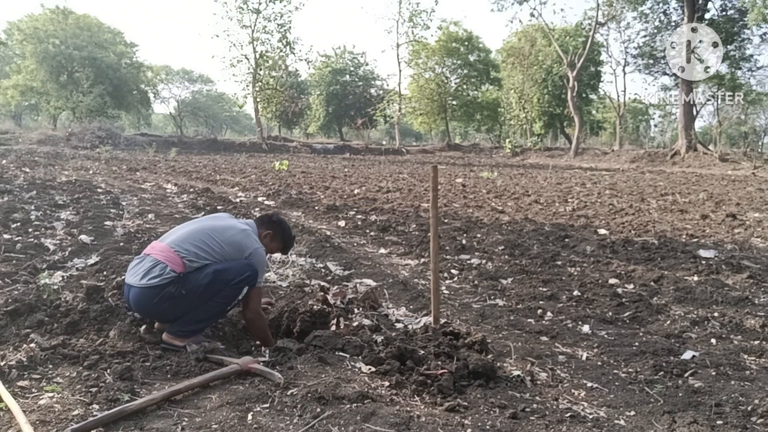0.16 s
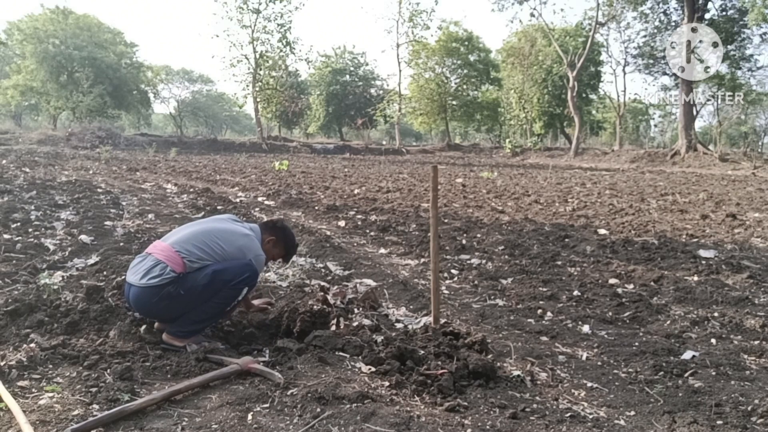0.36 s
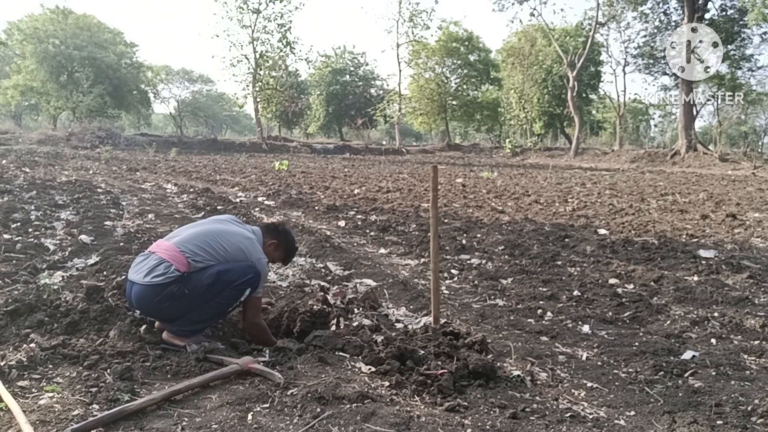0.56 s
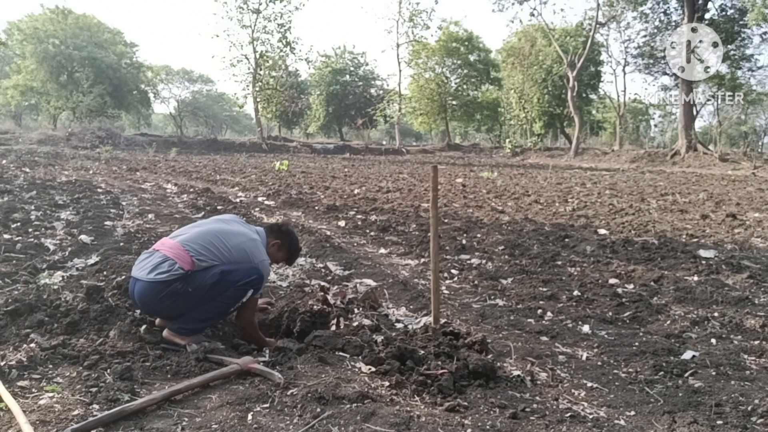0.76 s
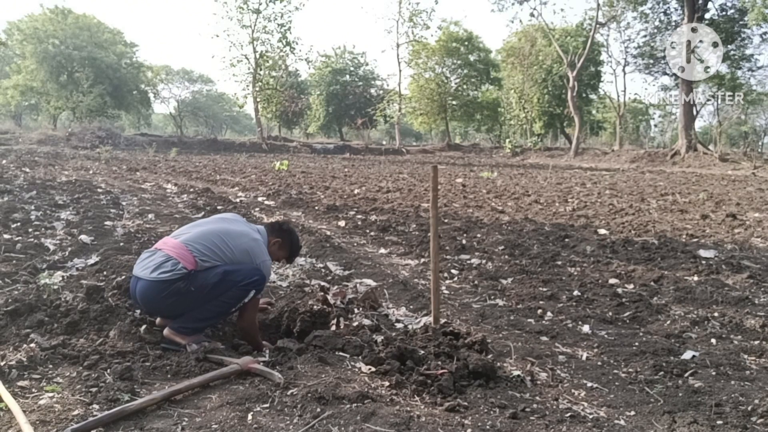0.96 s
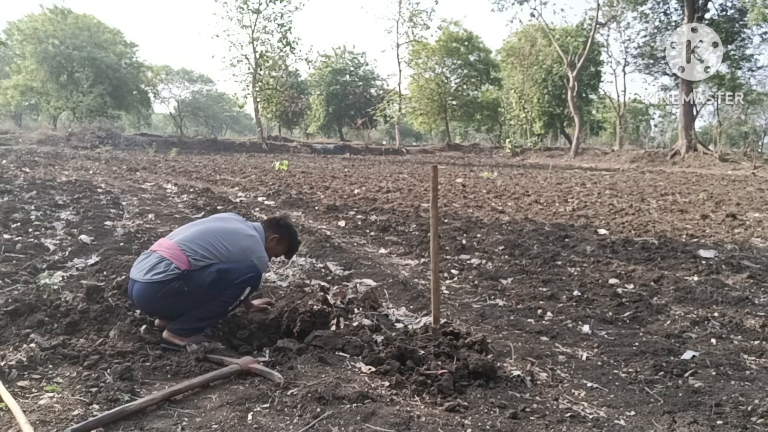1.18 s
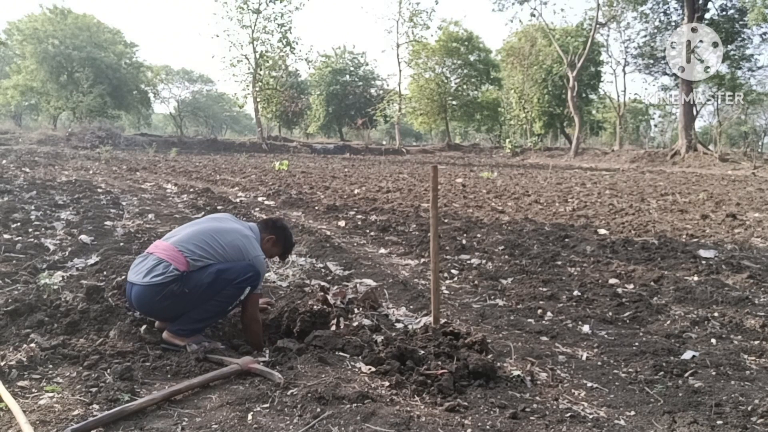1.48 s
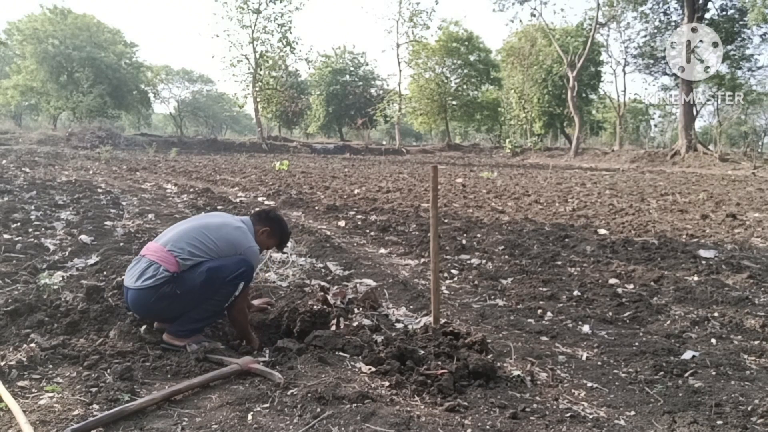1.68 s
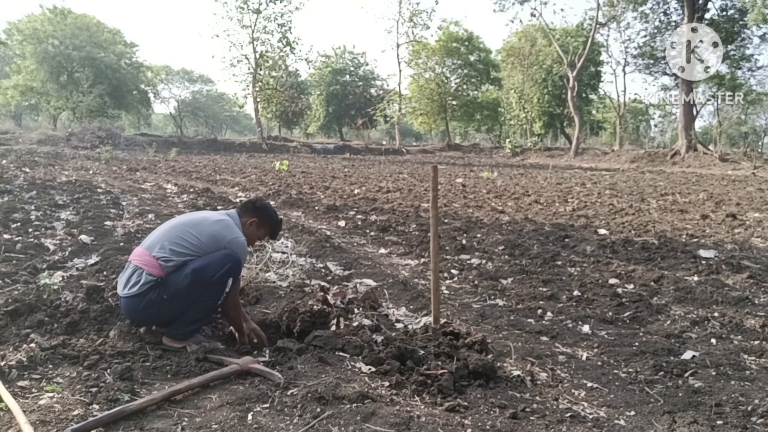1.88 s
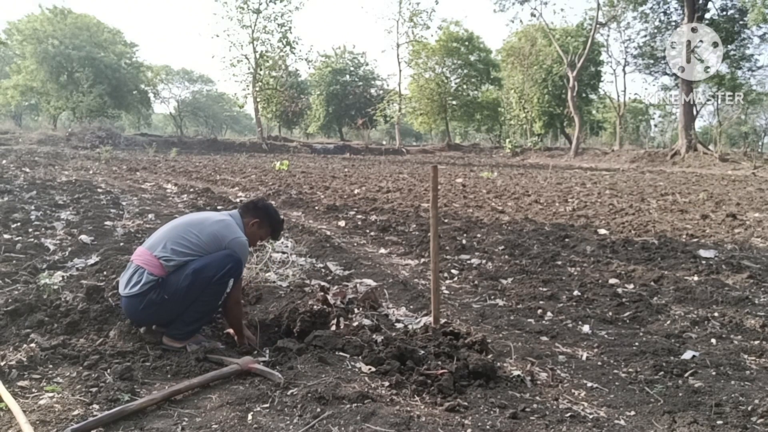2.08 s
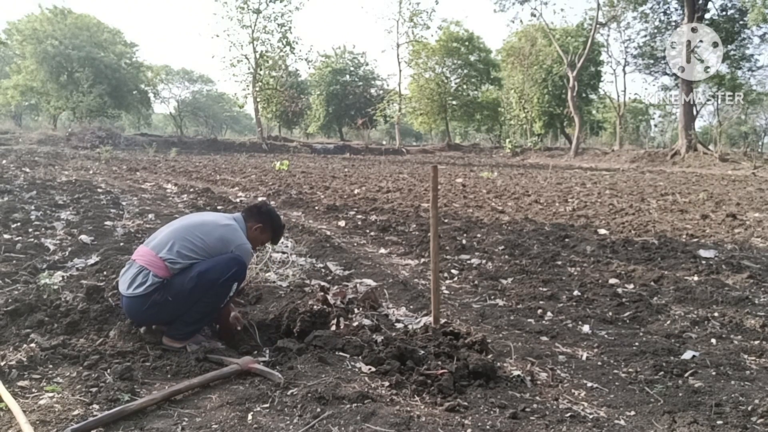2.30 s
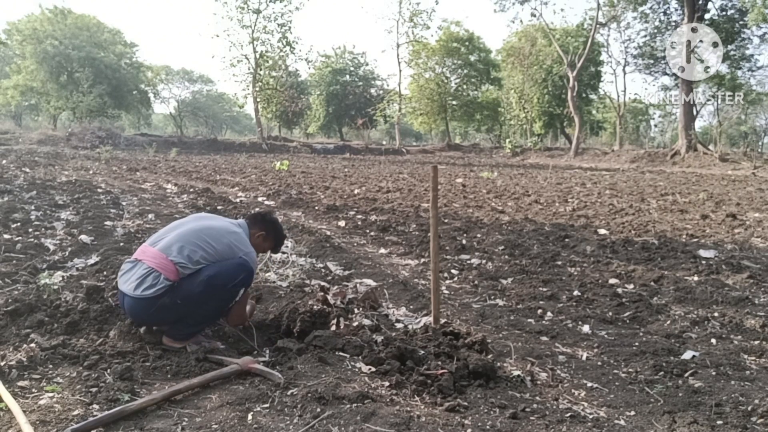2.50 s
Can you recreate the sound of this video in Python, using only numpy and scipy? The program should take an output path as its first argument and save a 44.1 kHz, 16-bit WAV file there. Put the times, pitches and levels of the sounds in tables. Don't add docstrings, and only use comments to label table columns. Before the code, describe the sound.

Hands scrape dry soil, left of centre: soft, short gritty strokes from the start, a sharp clod crack at 0.44 s, smaller cracks around 0.8 and 1.2 s. Rasping builds at 1.65 s into the loudest crunch at 1.85 s, with pebble ticks and faint thuds until 1.95 s. Sparse scrapes return from 2.3 s. Low wind flutters separately on both sides, strongest around 2.2 s; faint high birds chirp far off.

```python
import sys
import numpy as np
from scipy import signal
from scipy.fft import rfft, irfft
from scipy.io import wavfile
from scipy.ndimage import uniform_filter1d

SR = 44100
rng = np.random.default_rng(int(sys.argv[2]) if len(sys.argv) > 2 else 0)


def int16_out(signal):
    q = np.round(np.clip(np.atleast_2d(signal).T, -1, 1) * 32767)
    wavfile.write(sys.argv[1], SR, q.astype(np.int16))


def invert_db(level):
    return 10 ** (np.asarray(level, dtype=float) / 20)


N = 116865

# (start [s], rise [s], fall [s], left level [dB], tilt [dB per octave])
STROKES = [(.03, 0.0056, 0.0062, -66.5, -2.5), (0.085, 0.013, 0.02, -57.5, 3),
           (0.187, 0.022, 0.057, -60.5, 1.5), (0.388, 0.038, 0.077, -52.5, 1),
           (0.501, 0.034, 0.008, -58, 3), (0.602, 0.013, 0.0027, -66, -1.5), (0.741, 0.02, 0.051, -60, 1.5),
           (1.001, 0.015, 0.1, -71, -4), (1.118, 0.02, 0.13, -54.5, 1.5), (1.171, 0.042, 0.034, -53.5, 1.5),
           (1.261, 0.014, 0.035, -55, 4), (1.638, 0.033, 0.035, -52.5, 1.5),
           (1.674, 0.012, 0.074, -45, 0.5), (1.842, 0.003, 0.024, -29.5, -0.5),
           (1.85, 0.033, 0.027, -30, 0), (1.933, 0.073, 0.042, -53, 1), (2.31, 0.014, 0.052, -63.5, -5),
           (2.446, 0.066, 0.064, -53, 0.5), (2.53, 0.062, 0.02, -56.5, 7.5)]
# (time [s], peak level [dB], centre [Hz])
CLODS = [(0.1113, -37.5, 5560), (0.3426, -40.5, 5500), (0.4409, -22.5, 6350), (0.5289, -38.5, 4600),
         (0.605, -43, 5430), (0.7833, -34, 10800), (0.8116, -31.5, 11600), (1.0176, -40, 5257),
         (1.1397, -38, 5494), (1.1991, -41, 5350), (1.2063, -40, 3780), (1.2208, -30, 7800),
         (1.2296, -28, 5120), (1.2595, -43, 6200), (1.2727, -29, 10200), (1.3169, -37.5, 7500),
         (1.8455, -16.5, 8920), (2.3371, -54.5, 3760), (2.4194, -41.5, 8210)]
# (time [s], peak level [dB], centre [Hz])
PEBBLES = [(0.0338, -51.5, 3200), (0.0438, -48, 5330), (0.0972, -41, 5200), (0.2987, -50.5, 4960),
           (0.385, -43, 5600), (0.4265, -40, 5550), (0.4718, -38.5, 7050), (0.616, -39.5, 4940),
           (0.6569, -41, 12400), (0.7467, -45, 5870), (0.7587, -44.5, 5090), (0.7634, -43.5, 10200),
           (0.8375, -46, 7000), (0.8654, -59, 3652), (0.9504, -53, 5470), (1.0084, -49.5, 4700),
           (1.0545, -52, 5130), (1.07, -47.5, 11400), (1.1288, -45.5, 5423), (1.1534, -44, 6700),
           (1.4734, -43, 12660), (1.5095, -44.5, 10640), (1.5399, -54, 3250), (1.5754, -50, 9900),
           (1.6287, -49.5, 6920), (1.6611, -42, 2590), (1.6796, -31, 10500), (1.7644, -45, 5850),
           (1.8484, -35.5, 5203), (1.8644, -31, 5136), (1.8684, -30, 2838), (1.8824, -37, 5200),
           (1.8874, -25, 5150), (1.9114, -22, 12300), (1.9639, -35.5, 13720), (2.0204, -47, 5350),
           (2.0667, -52, 5440), (2.1824, -53.5, 14170), (2.3434, -55, 3705), (2.3894, -56, 13740),
           (2.4693, -37, 11180), (2.5461, -35.5, 13800), (2.5944, -37, 13900)]
# (time [s], peak level [dB], centre [Hz])
THUDS = [
    (1.849, -32, 705),
    (1.883, -35, 910),
    (1.914, -44, 997),
]
# (time [s], length [s], level [dB])
PUFFS_LEFT = [(0.21, 0.031, -45), (0.587, 0.042, -38), (0.704, 0.015, -48.5), (0.739, 0.031, -37),
              (0.891, 0.012, -46.5), (1.049, 0.024, -43), (1.225, 0.018, -45), (1.245, 0.014, -45.5),
              (1.347, 0.038, -34.5), (1.402, 0.016, -35), (1.439, 0.01, -43.5), (1.498, 0.071, -34.5),
              (1.561, 0.043, -36), (1.618, 0.019, -35), (1.644, 0.0074, -35.5), (1.674, 0.011, -36.5),
              (1.785, 0.03603, -44), (1.825, 0.01, -42.5), (2.075, 0.029, -41), (2.147, 0.033, -28.5),
              (2.216, 0.03, -29), (2.283, 0.038, -31), (2.326, 0.0096, -47.5), (2.382, 0.023, -36)]
PUFFS_RIGHT = [(0.516, 0.03, -32.5), (0.569, 0.015, -34), (0.665, 0.016, -44), (0.693, 0.014, -40),
               (0.811, 0.017, -38), (0.919, 0.036, -36.5), (0.953, 0.0061, -36.5), (1.022, 0.017, -40.5),
               (1.096, 0.013, -41.5), (1.137, 0.014, -38.5), (1.286, 0.016, -38), (1.37, 0.023, -35),
               (1.405, 0.02, -40.5), (1.457, 0.015, -43), (1.57, 0.0192, -42), (1.766, 0.0323, -36),
               (1.885, 0.01, -34.5), (2.002, 0.027, -32), (2.046, 0.031, -32.5), (2.091, 0.014, -34.5),
               (2.124, 0.013, -31), (2.227, 0.02, -36), (2.357, 0.018, -36.5)]
# (time [s], peak level [dB])
FLICKS_LEFT = [(2.156, -28), (2.17, -30), (2.221, -25.5), (2.291, -24)]
FLICKS_RIGHT = [(0.912, -41.5), (1.365, -43), (1.778, -36.5), (2.091, -32), (2.123, -39.5), (2.226, -39.5),
                (2.344, -36.5)]
# (time [s], level [dB])
BREEZE = [
    (0, -58),
    (.45, -50.5),
    (1.3, -51),
    (1.8, -53),
    (2.15, -45.5),
    (2.65, -53.5),
]
# (start [s], tick level [dB], whistle level [dB])
TWITTERS = [(0.139, -73, -68), (0.345, -72, -70), (2.008, -94, -64), (2.217, -66, -63), (2.438, -73, -71)]
# (time from call start [s], pitch [Hz], level [dB])
TICK = [(0, 4570, -3), (.005, 7000, 6.5), (.009, 8050, 2.5), (0.022, 8400, -15)]
WHISTLE = [(0.056, 11800, -11), (0.067, 11160, -6.5), (0.081, 6960, -3), (0.09, 5540, 6.5),
           (.115, 4000, -52)]
# (time [s], pitch [Hz], level [dB])
SWOOP = [(0.114, 5650, -65), (0.144, 5330, -65), (0.188, 5210, -68.5), (0.21, 5210, -68),
         (0.226, 5630, -67)]
# (start [s], length [s], from [Hz], to [Hz], level [dB])
GLIDES = [ (0.598, 0.015, 1810, 1790, -72), (0.663, 0.012, 12900, 11800, -64.5),
          (0.916, 0.029, 11900, 11840, -70), (1.07, 0.033, 11250, 11740, -71.5),
          (1.273, 0.0062, 1780, 1910, -67), (1.318, 0.055, 13670, 13090, -70),
          (1.415, 0.059, 8690, 10400, -72), (1.582, 0.018, 9550, 10500, -71.5),
          (0.068, 0.014, 14200, 14900, -79), (.478, 0.014, 13200, 11900, -64),
          (0.565, 0.013, 13600, 11900, -66), (0.842, 0.017, 11400, 11500, -77),
          (1.321, 0.02, 12680, 12420, -59), (1.441, 0.011, 12600, 11400, -72),
          (1.467, 0.031, 11600, 12900, -73), (1.6, 0.02, 12400, 13140, -72),
          (2.222, 0.013, 12430, 11000, -78.5), (2.622, 0.017, 13000, 12300, -67)]
# (frequency [Hz], gain [dB])
SOIL_COLOUR = [(330, -20.5), (650, -17.5), (1500, -7), (2500, -4.5), (4800, -5), (15500, -3.5)]
AIR_COLOUR = [(270, -42), (460, -3.5), (2250, -1), (2540, -5), (5530, 0), (9400, -2), (15500, 1)]
PORT_COLOUR = [(25, -18.5), (75, 0.5), (118, -1.5), (376, -24), (560, -32)]
MIC_COLOUR = [(20, -1), (6500, 0), (9000, -6), (11300, -.6), (13000, -7.5), (14900, 1), (15500, 5)]

NEAR_LAG = 1.1


def level(x, db=0):
    return x * invert_db(db) / np.sqrt(np.mean(x ** 2))


def white():
    return rng.standard_normal(N)


def freqs():
    return np.maximum(np.arange(N // 2 + 1) * SR / N, 1)


def colour(x, points):
    f = freqs()
    hz, db = np.array(points).T
    gain = invert_db(np.interp(np.log(f), np.log(hz), db)) * np.minimum(f / hz[0], 1) ** 2
    return irfft(rfft(x) * gain, N)


def band(x, hz, octaves):
    bell = np.exp(-.5 * (np.log2(freqs() / hz) / octaves) ** 2)
    return irfft(rfft(x) * bell, N)


def late(x, lag):
    return irfft(rfft(x) * np.exp(-2j * np.pi * freqs() * lag / SR), N)


def walk(rate):
    hold = int(SR / rate)
    steps = np.repeat(rng.standard_normal(N // hold + 1), hold)
    slewed = uniform_filter1d(uniform_filter1d(steps, hold), hold)
    return level(slewed[:N])


def ring_grains(hits):
    grain_s = .0007
    return signal.lfilter([1], [1, -np.exp(-1 / (grain_s * SR))], hits)


def grit():
    grains_per_s, scatter_db, hiss_share = 1800, 4, .3
    sizes = invert_db(scatter_db * np.minimum(rng.exponential(size=N), 3.6))
    hits = (rng.random(N) < grains_per_s / SR) * sizes
    return level(ring_grains(hits)) + hiss_share


def soil(t):
    crumbs_per_s, crumb_db = 110, -70
    patch_db, patches_per_s = 3.4, 60
    out, shared = 0, grit()
    falls = (rng.random(N) < crumbs_per_s / SR) * invert_db(crumb_db + 4 * white())
    for hz in 600 * 2 ** np.arange(0, 5, .5):
        power = np.zeros(N)
        for start, rise, fall, db, tilt_db in STROKES:
            attack = np.clip((t - start) / rise, 0, 1)
            decay = np.exp(-np.maximum(t - start - rise, 0) / fall)
            power += (invert_db(db + tilt_db * np.log2(hz / 5600)) * attack * decay) ** 2
        grains = 0.51 * shared + 0.3 * grit()
        patches = invert_db(patch_db * walk(patches_per_s))
        out = out + band(np.sqrt(power) * grains * patches * white(), hz, 0.29)
        crumbs = ring_grains(falls * rng.exponential(size=N))
        out = out + band(crumbs * white(), hz, 0.16)
    unit = colour(white(), SOIL_COLOUR)
    return invert_db(4.0) * colour(out, SOIL_COLOUR) / np.std(unit)


def clods(table, octaves):
    boost_db, crack_s, tail_s, tail_db = 3.5, .0003, .004, -15
    out, n = np.zeros(N), 1024
    u = np.arange(n) / SR - .002
    f = np.maximum(np.arange(n // 2 + 1) * SR / n, 1)
    for s, db, hz in table:
        noise = rng.standard_normal(n)
        crack = np.exp(-np.abs(u) / np.where(u < 0, .0003, crack_s))
        crumble = uniform_filter1d(noise, size=30) ** 2 * 30
        tail = invert_db(tail_db) * (u > 0) * np.exp(-u / tail_s) * crumble
        pitch = 0.081 * (f > 900) + np.exp(-.5 * (np.log2(f / hz) / octaves) ** 2)
        tick = irfft(rfft((crack + tail) * noise) * pitch, n)
        i = int(s * SR) - 44
        out[i:i + n] += tick * invert_db(db + boost_db) / np.abs(tick).max()
    return out


def ports(x):
    far_db, near_db, apart_db, far_lag = -10.5, -11, -16, 11.1
    paths = invert_db(far_db) * late(x, far_lag) - invert_db(near_db) * late(x, NEAR_LAG)
    remainder = invert_db(apart_db) * band(x * walk(3000), 9000, 1.5)
    return np.array([x, band(paths, 1800, 1.7) + remainder])


def wind(t, puffs, flicks):
    stretch, flutter_per_s, flutter_octaves, second_db = .7, 130, .3, -6.5
    flick_hz, flick_s, buffet_db = 296, .0016, -14
    power = sum(invert_db(2 * db) * np.exp(-((t - s) / (stretch * length)) ** 2) for s, length, db in puffs)
    env = np.sqrt(power)
    rate = 95 * (1 + (env / invert_db(-29.5)) ** .5 * .4)

    def eddy(share):
        hz = share * rate * 2 ** (flutter_octaves * walk(flutter_per_s))
        return np.sin(2 * np.pi * np.cumsum(hz) / SR)

    flutter = env * invert_db(4.17 * walk(90)) * (1.063 * eddy(.9) + invert_db(second_db) * eddy(1.5))
    for s, db in flicks:
        pulse = invert_db(db) / (1 + ((t - s) / flick_s) ** 2)
        flutter = flutter + pulse * np.cos(2 * np.pi * flick_hz * (t - s) + 1)
    buffet = level(band(white(), 212, 0.67))
    flutter = flutter + invert_db(buffet_db) * env ** 2 / invert_db(-24.0) * buffet
    rumble = level(colour(white() * invert_db(3.3 * walk(24.94)), PORT_COLOUR))
    rumble = band(rumble, 79, 1.55) * invert_db(np.interp(t, *np.array(BREEZE).T))
    return signal.sosfilt(signal.butter(2, 45, "high", fs=SR, output="sos"), flutter) + rumble


def note(t, s, shape, db):
    u, hz, gain_db = np.array(shape, float).T
    out = np.zeros(N)
    k = slice(int((s + u[0]) * SR), min(int((s + u[-1]) * SR), N))
    a = t[k] - s
    edge = np.clip(np.minimum(a - u[0], u[-1] - a) / (0.04 * (u[-1] - u[0])), 0, 1)
    out[k] = edge * invert_db(db + np.interp(a, u, gain_db))
    return out, k, np.interp(a, u, hz)


def birds(t):
    warble, right_db, echo_db, echo_s = .003, -2, -4, .014
    out, wobble = np.zeros(N), walk(300)
    fading = invert_db(1.33 * walk(150) + 3.0)
    notes = [(s, TICK, tick_db) for s, tick_db, _ in TWITTERS]
    notes += [(s, WHISTLE, whistle_db) for s, _, whistle_db in TWITTERS]
    notes += [(0, SWOOP, 0.0096)]
    notes += [(s, [(0, low, 0), (d, high, 0)], db) for s, d, low, high, db in GLIDES]
    for s, shape, db in notes:
        env, k, hz = note(t, s, shape, db)
        pitch = hz * (1 + warble * (hz / 5300) ** 2 * wobble[k])
        out[k] += np.sqrt(2) * env[k] * fading[k] * np.sin(2 * np.pi * np.cumsum(pitch) / SR)
    u = np.arange(6000) / SR

    def echo():
        decay = np.exp(-u / echo_s) * np.sqrt(2 / echo_s / SR)
        wash = invert_db(echo_db) * rng.standard_normal(len(u)) * decay
        return signal.fftconvolve(out, wash)[:N]

    return np.array([out + echo(), invert_db(right_db) * (echo() - late(out, -2.57))])


def air():
    air_db, shared = -71, 0.31

    def hiss():
        return sum(band(white() * invert_db(2.6 * walk(16)), hz, .45) for hz in 700 * 2 ** np.arange(5))

    left = level(colour(hiss(), AIR_COLOUR), air_db)
    right = level(colour(hiss(), AIR_COLOUR), air_db - 0.5)
    return np.array([left, right - shared * late(left, NEAR_LAG)])


def scene():
    t = np.arange(N) / SR
    digging = ports(soil(t) + clods(CLODS, 0.58))
    dropping = ports(clods([*PEBBLES, *THUDS], 0.7))
    gusts = np.array([wind(t, PUFFS_LEFT, FLICKS_LEFT), wind(t, PUFFS_RIGHT, FLICKS_RIGHT)])
    return digging + dropping + gusts + birds(t) + air()


def low_pass(x):
    return signal.sosfilt(signal.butter(12, 16640, fs=SR, output="sos"), x)


def record(dry):
    mix = np.array([colour(port, MIC_COLOUR) for port in dry])
    mix = signal.sosfilt(signal.ellip(8, .2, 36, 15450, fs=SR, output="sos"), mix)
    return low_pass(mix)


dry = scene()
out = record(dry)
int16_out(out)
```